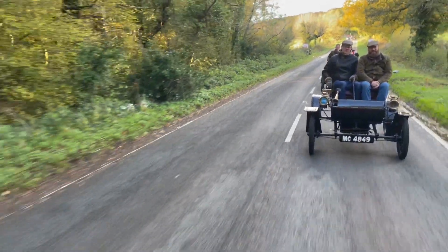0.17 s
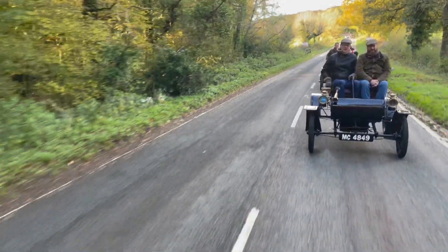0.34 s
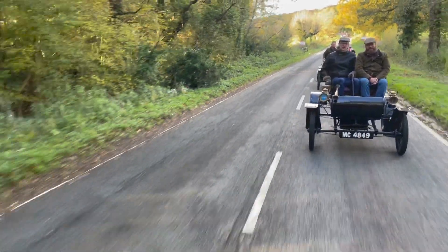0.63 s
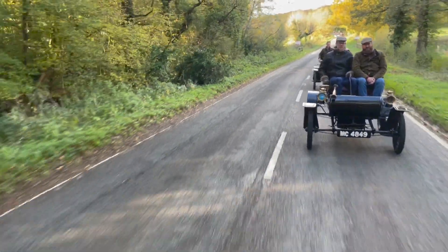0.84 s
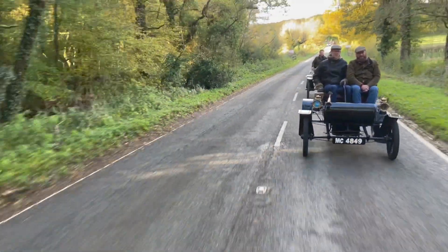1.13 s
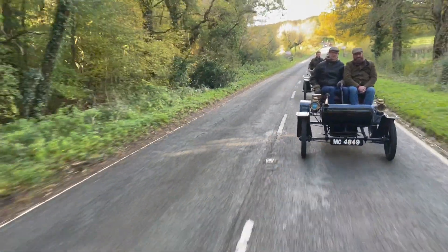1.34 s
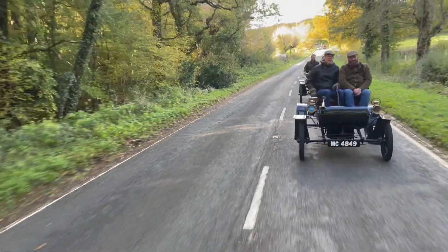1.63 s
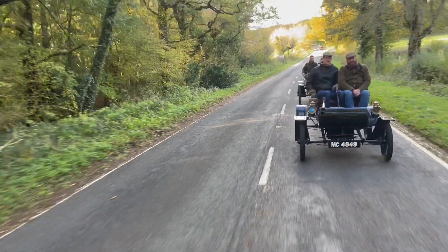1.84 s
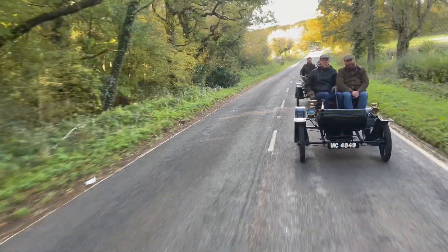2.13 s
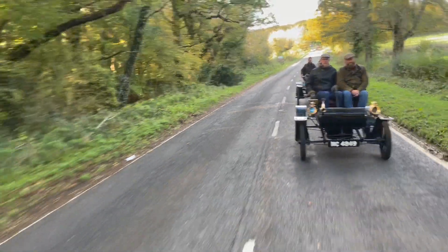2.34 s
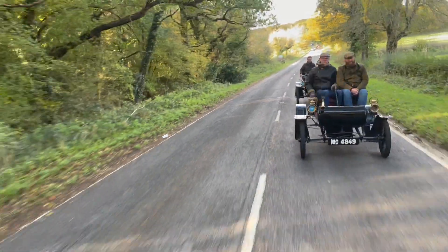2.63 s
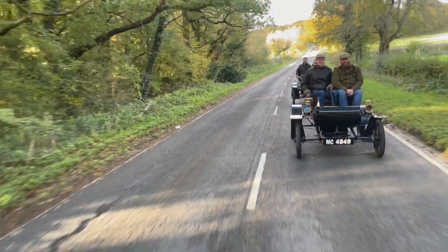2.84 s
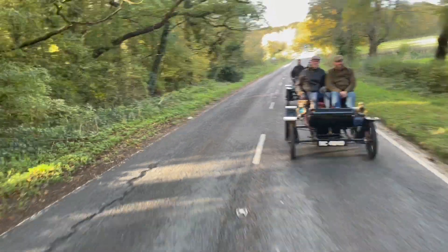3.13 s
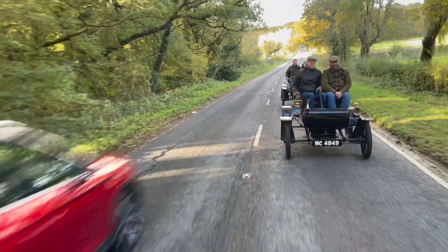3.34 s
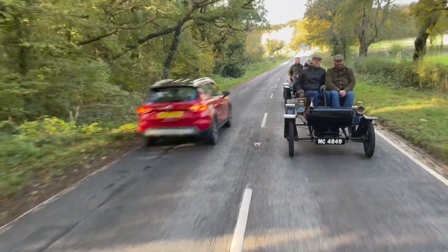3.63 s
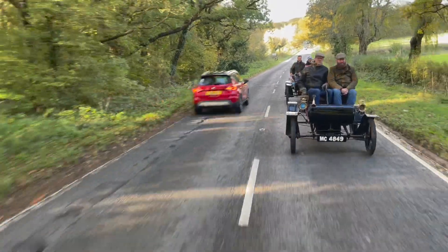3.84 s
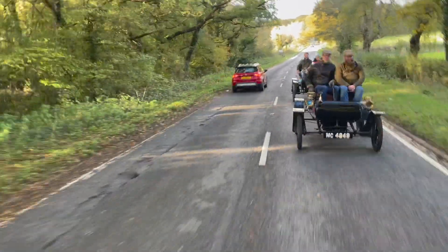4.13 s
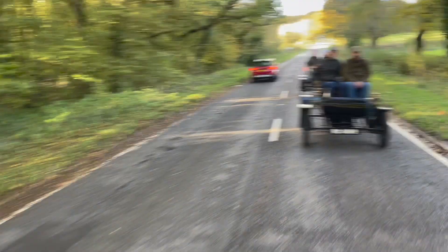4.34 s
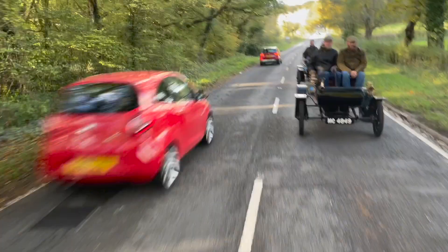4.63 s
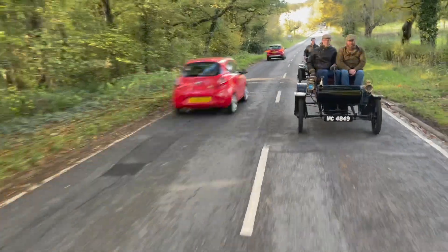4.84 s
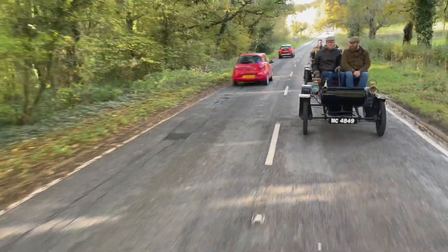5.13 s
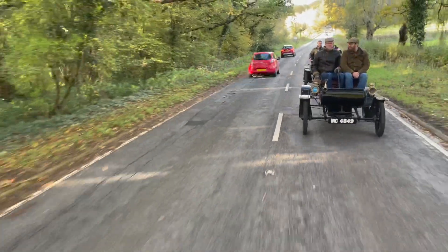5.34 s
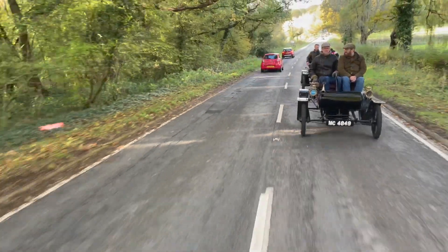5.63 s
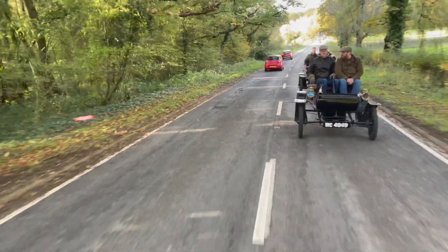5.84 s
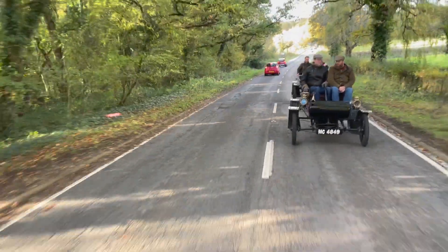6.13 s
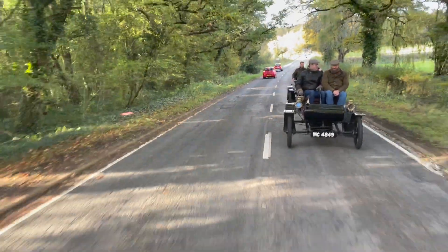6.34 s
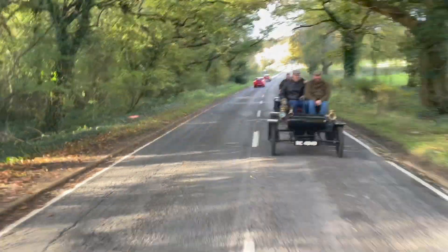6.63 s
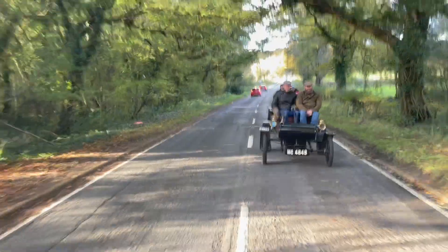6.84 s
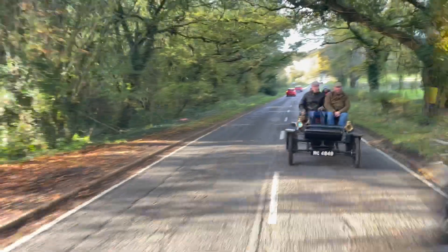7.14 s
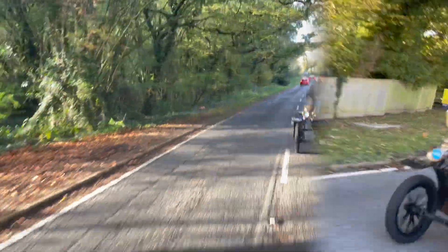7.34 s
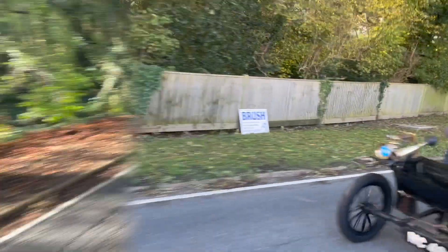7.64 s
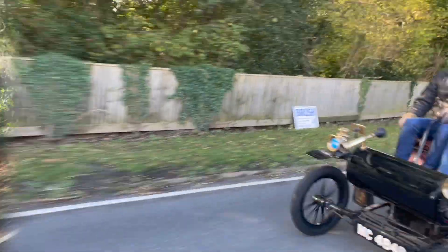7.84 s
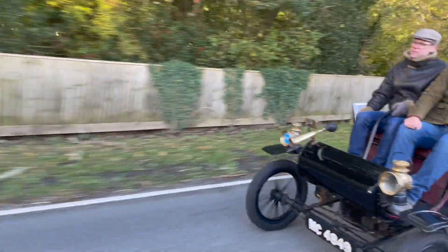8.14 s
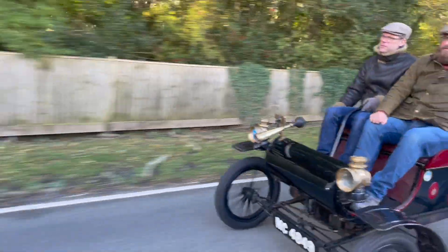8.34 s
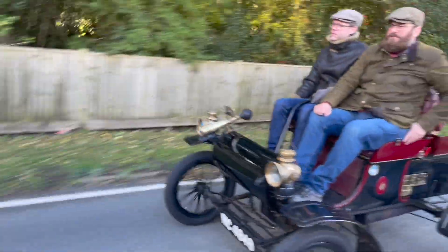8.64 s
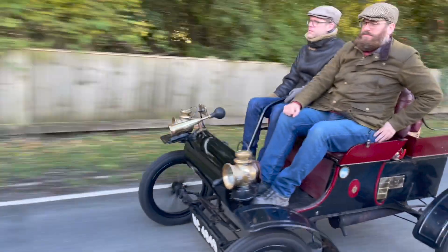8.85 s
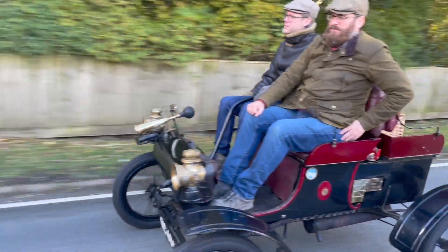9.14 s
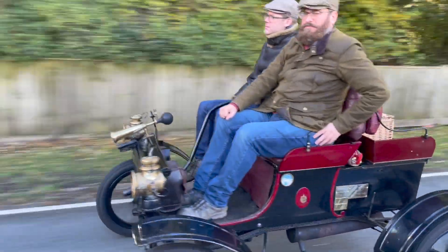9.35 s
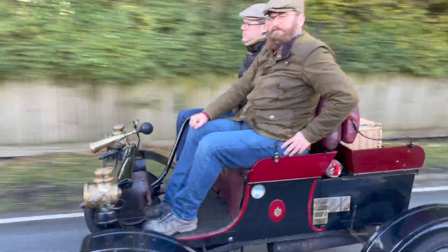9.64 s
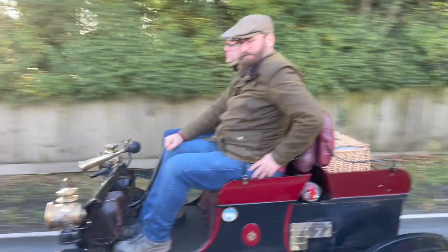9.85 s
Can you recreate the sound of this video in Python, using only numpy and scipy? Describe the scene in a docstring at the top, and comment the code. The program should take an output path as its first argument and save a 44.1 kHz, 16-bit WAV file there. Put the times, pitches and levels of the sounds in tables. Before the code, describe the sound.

Wind thumps a microphone on a moving veteran car; its engine clatters, two cars swish past, then a hissing single-cylinder engine chuffs loudly alongside.

```python
"""Engine thuds and puffs are heard first, on board an old car on a country road, with tyre roar and wind
buffeting. A single-cylinder veteran car is heard behind, hissing at each firing; from about 7.4 s its chuffs
are much louder and come faster. Two oncoming cars swish past, and the airstream hums and moans in a hollow of
the bodywork. Engines are pulses of noise and clicks through resonances; tyres and wind are coloured noise with
moving levels; eddies are short knocks of falling pitch, and the moan is a gliding tone."""
import sys
import numpy as np
from scipy import signal
from scipy.fft import rfft, irfft, next_fast_len
from scipy.io import wavfile
from scipy.ndimage import uniform_filter1d, map_coordinates

SR = 44100
rng = np.random.default_rng(int(sys.argv[2]) if len(sys.argv) > 2 else 0)


def output_pcm(signal):
    """Save a mono or channel-first signal as 16-bit PCM at the path in sys.argv[1].

    Samples are clipped to [-1, 1] before scaling.
    """
    pcm = np.clip(np.atleast_2d(signal).T, -1, 1) * 32767
    wavfile.write(sys.argv[1], SR, np.round(pcm).astype(np.int16))


N = 440559
T = np.arange(N) / SR  # t/s

# All levels in the tables are relative: the functions add their own trims.
# Own engine, running count of firings: t/s, firings so far
OWN_FIRINGS = [(.0213, 0), (.758, 11), (1.3635, 20), (1.768, 26), (2.72, 40), (2.924, 43), (3.888, 57),
               (4.168, 61), (4.7925, 70), (5.493, 80), (6.904, 100), (8.33, 120), (10.02, 144)]
# Own engine, parts of each knock: t/s, knock level/dB, clatter level/dB, ring level/dB
KNOCK_LEVELS = [(0, -27, -32.5, -40), (1.2, -30.5, -29.5, -35), (1.7, -29.5, -30.5, -32),
                (2.05, -24.5, -28.5, -26.5), (2.6, -27.5, -35, -28), (3.2, -30, -34, -29),
                (3.6, -34, -34, -32), (4, -32, -31, -34), (5.2, -34.5, -32, -40), (5.9, -34.5, -32, -41),
                (6.5, -40, -31.5, -39), (7.1, -42, -32, -38), (7.7, -46, -46, -48), (8.5, -37, -49, -42),
                (9.99, -45, -48, -49)]
# Own engine, thud through the body: t/s, level/dB
THUD_LEVEL = [(0, -28.5), (1.5, -25.5), (2.2, -19.5), (4, -20), (6.2, -22.5), (7.2, -30), (7.8, -24),
              (8.4, -34), (9, -24), (9.99, -34)]
# Resonances of knock, clatter, ring and body: f/Hz, width/Hz, level/dB
KNOCK_MODES = [(893, 52, 0), (745, 70, -12)]
CLATTER_MODES = [(1272, 85, 0)]
RING_MODES = [(1390, 38, 0), (1830, 70, -5)]
BODY_MODES = [(70.3, 17.5, -5), (101.7, 7.2, 2), (170, 55, -12), (261, 22, -9)]

# Single cylinder, count of firings while following and while alongside: t/s, firings so far
FOLLOWING_FIRINGS = [(.126, 0), (.77, 4), (1.583, 9), (2.405, 14), (3.235, 19), (4.08, 24), (4.934, 29),
                     (5.805, 34), (6.69, 39)]
ALONGSIDE_FIRINGS = [(7.42, 0), (8.112, 5), (8.798, 10), (9.34, 14), (9.875, 18)]
# Single cylinder, exhaust chuff: t/s, level/dB
CHUFF_LEVEL = [(0, -31.5), (2, -32), (2.7, -34), (4.3, -37), (5.3, -35.5), (6.5, -36.5), (7.4, -38),
               (7.75, -27), (8.15, -20.5), (9.3, -18), (9.99, -19)]
# Firings that bark: t/s, level/dB, ring f/Hz
BARKS = [(8.112, -26, 4900), (8.798, -38, 5100), (8.935, -27, 2350), (9.34, -20, 3600),
         (9.608, -20.5, 5340), (9.742, -28, 2900), (9.875, -28, 2500)]
# Spectrum of the exhaust jet: f/Hz, level/(dB per Hz)
CHUFF_SPECTRUM = [(300, -4), (900, 14), (1500, 7.5), (2300, 8), (3300, 5), (4200, 5), (5400, 6.5),
                  (6800, -3.5), (11500, 3), (14000, -3.5)]
# Stereo image of the exhaust jet: f/Hz, left-right likeness
CHUFF_LIKENESS = [(700, .1), (1500, 0.42), (2300, 0.88), (5500, 1), (9000, 0.3)]
# Resonances of the exhaust jet and of the silencer: f/Hz, width/Hz, level/dB
CHUFF_MODES = [(2400, 430, 2), (3090, 710, -1.5), (4770, 750, 0), (6300, 1500, 4)]
SILENCER_MODES = [(171, 24, 0), (382, 41, -7), (878, 45, -7.5), (1210, 260, -14)]

# Oncoming cars: t/s, swish level/dB, roar level/dB, half length/s
PASSES = [(3.378, -28, -27, .15), (4.49, -23, -26.5, .17)]
# Bright tyre hiss of the oncoming cars: t/s, level/dB, half length/s
SPRAYS = [(3.26, -33, 0.086), (4.405, -29, 0.035)]
# Spectra of swish, roar and spray: f/Hz, level/(dB per Hz)
SWISH_SPECTRUM = [(200, -8), (600, 20), (900, 26), (1150, 25), (1600, 12), (2600, 4), (7000, -15),
                  (14000, -40)]
ROAR_SPECTRUM = [(150, -20), (300, -5), (470, 0), (700, -7), (1200, -9), (3000, -50)]
SPRAY_SPECTRUM = [(1000, -20), (2000, -5), (2700, 1.5), (4000, -7), (7000, -11), (14000, -15)]

# Moan and hum of the hollow: t/s, moan f/Hz, moan level/dB, hum level/dB
MOAN = [(8.3, 490, -47, -62), (8.32, 500, -14.5, -19), (8.335, 612, -29, -20), (8.365, 607, -19, -14),
        (8.39, 580, -27, -21), (8.425, 543, -32, -14.5), (8.468, 440, -31, -17), (8.5, 396, -32, -24),
        (8.6, 380, -36, -24), (8.75, 380, -80, -80)]
# Noisy hum of the hollow: t/s, level/dB
HOLLOW_LEVEL = [(0, -22.5), (2.7, -24.5), (3.4, -25.5), (4.6, -32.5), (5.8, -21), (6.8, -29.5), (7.9, -49),
                (8.5, -23.5), (9.99, -33)]
# Resonances of the hollow: f/Hz, width/Hz, level/dB
HOLLOW_MODES = [(258.3, 30.4, 23), (513, 39, -14)]

# Eddies that hit the microphone: t/s, peak level/dB, f/Hz
THUMPS = [(0.284, -3.5, 340), (.296, -13, 427), (.835, -13, 285), (.87, -8.5, 179), (.891, -10.5, 420),
          (1.286, -1.5, 260), (1.298, -9, 301), (1.313, -2.5, 260), (1.321, -13, 243), (1.44, -7.5, 420),
          (1.598, -9.5, 337), (1.75, -5, 252), (1.762, -5.5, 383), (1.82, -10, 285), (1.858, -12, 434),
          (2.011, 0, 289), (2.114, 0, 450), (2.124, -3, 231), (2.137, -11, 484), (2.157, -3, 383),
          (2.19, -9, 288), (2.234, -1, 308), (2.245, -3, 328), (2.349, -2.5, 220), (2.603, -3.5, 288),
          (3.067, -11, 755), (3.073, -2, 197), (3.137, -6.5, 344), (3.208, -3.5, 540), (3.336, -11, 765),
          (3.471, -6, 480), (3.499, -10, 488), (3.519, -4, 169), (3.537, -4, 272), (3.56, -10, 498),
          (3.567, -8, 218), (4.176, -4, 218), (4.195, -7, 218), (4.279, -12, 292), (4.624, -9.5, 450),
          (5.21, -12, 281), (5.356, -9, 238), (5.365, -4.5, 223), (5.54, -10.5, 521), (5.664, -10.5, 389),
          (5.706, -9, 240), (5.721, -5.5, 527), (5.732, -1.5, 622), (5.769, -5.5, 501), (5.838, -6.5, 238),
          (5.913, -8, 294), (5.923, 2, 308), (6.075, -4.5, 540), (6.133, -6.5, 372), (6.146, -8, 770),
          (6.204, -13, 447), (6.22, -10, 557), (6.322, -16, 850), (6.339, -10.5, 702), (6.361, -13, 334),
          (6.39, -8, 329), (6.444, -4, 300), (6.482, -11, 398), (6.488, -10.5, 850), (6.494, -8, 596),
          (6.509, -7, 343), (6.536, -7, 515), (6.559, -6, 299), (6.586, -8, 356), (6.734, -7.5, 617),
          (6.743, -9, 620), (6.78, -10.5, 400), (6.804, -8, 603), (6.841, -8.5, 430), (6.893, -10, 520),
          (6.907, -16, 451), (6.941, -12, 602), (7.132, -13, 550), (7.152, -9, 560), (7.183, -8, 576),
          (7.276, -14, 328), (7.332, -17, 450), (7.529, -16, 651), (7.566, -14, 520), (7.85, -14, 404),
          (8.607, -7, 240), (8.635, -6.5, 329), (8.809, -9.5, 248), (9.38, -10.5, 282), (9.558, -11, 425)]
# Airflow at the microphone: t/s, level/dB
WIND_LEVEL = [(0, -23), (.55, -24.5), (.85, -15.5), (1.2, -18), (1.5, -27.5), (2.05, -15), (2.6, -21),
              (3.1, -15.5), (3.85, -19), (4.25, -18), (5.3, -19.5), (6.05, -13.5), (6.6, -23), (7.15, -25),
              (8.35, -20.5), (8.57, -16.5), (8.9, -22), (9.99, -23.5)]
# Deepest rumble over the rest: t/s, level/dB
DEEP_LEVEL = [(0, -18), (.6, -20), (1.3, -15), (2, -6.5), (9.99, -5.5)]
# Lulls, as the microphone falls into shelter: t/s, depth/dB, half length/s
LULLS = [(5.288, 0, 0.027), (5.458, 5, 0.026), (6.28, 15, 0.031), (7.85, 4.5, 0.49)]
# Spectra of rumble, deepest rumble, flutter and the tearing edge of gusts: f/Hz, level/(dB per Hz)
RUMBLE_SPECTRUM = [(25, -45), (45, -18), (60, -1), (75, 4), (105, 1.5), (150, -3), (220, -6.5),
                   (320, -11.5), (600, -85)]
DEEP_SPECTRUM = [(15, -20), (24, -16), (35, -9), (52, 3.5), (70, -1), (100, -25), (200, -70)]
FLUTTER_SPECTRUM = [(120, -8), (200, -1), (265, 0), (320, -3), (480, 4), (700, -4.5), (1100, -16.5),
                    (2200, -55), (5000, -79)]
CHOP_SPECTRUM = [(150, -25), (400, 0), (700, 0.5), (1100, -5), (1500, -9.5), (2500, -35), (5000, -70)]

# Tyre roar of the own car: t/s, level/dB
ROAD_LEVEL = [(0, -34.5), (2.1, -33), (4.7, -35.5), (5.9, -36), (6.55, -33.5), (7.1, -34), (7.45, -38.5),
              (7.75, -44.5), (8.1, -40.5), (8.45, -35), (9.35, -37.5), (9.6, -33), (9.99, -36)]
# Spectra of tyre roar and of the rush of air: f/Hz, level/(dB per Hz)
TYRE_SPECTRUM = [(60, -39), (260, 3), (500, 3), (900, 2), (1300, 0.5), (1650, -3), (2100, -3.5),
                 (2900, -15), (4500, -35), (9000, -78)]
HISS_SPECTRUM = [(900, -4), (2200, 9.5), (3200, 11.5), (5000, 7), (7000, 8.5), (11500, 3), (14000, -4.5)]

# Stereo image of noise: f/Hz, left-right likeness
LIKENESS = [(60, 0.84), (150, 0.92), (350, 0.61), (700, 0.09), (1400, 0.34), (2800, 0.36), (5500, 0.5),
            (10000, -2.33)]
# Stereo balance: f/Hz, left minus right level/dB
BALANCE = [(100, -0.5), (350, -0.5), (700, 3.5), (1400, -0.5), (2800, 0.5), (5500, 4), (10000, -1)]
# Brief dips of the whole level: t/s, depth/dB, recovery/s
DIPS = [(2.123, 3.5, 1), (5.726, 5, 0.52)]

DUCT_WIDTH_HZ = 260  # the duct rounds the start of each ring
SILENCER_DB = -13  # boom relative to the chuff curve
LINGER = 1.35  # a passing car fades this much more slowly than it swells
FLUTTER_DB, FLUTTER_GROWS = -25.5, 0.079  # at average wind, and dB per dB of wind
GUST_DB, GUST_RISE_S, GUST_FALL_S = -15.5, 0.013, 0.028  # level over the thump it carries, build-up, release
FLURRY_S, FLURRY_HALF_S, FLURRY_DB = 6.6, 0.31, -15  # spell of choppy air: middle, half length, eddy peak
FLURRY_EDDIES = 300
PATTER_DB, PATTER_GROWS, PATTER_HZ = -22, 0.36, 427.8  # eddy peak at average wind, dB per dB, middle pitch
CHOP_DB, CHOP_DB_PER_OCTAVE, CHOP_HZ, CHOP_S = -13.9794, 10, 600, 0.0087  # over a thump of CHOP_HZ; life
HISS_DB, HISS_GROWS = -33.5, 0.52  # rush of air, and its dB per dB of the chuff curve
LEFT_LEAD_S = .00002  # the whole scene reaches the left port this much earlier
TOP_HZ = 14000  # end of the band


def own_engine(left_lead_s=0.00018, tap_s=0.00401, gas_db=-11):
    """Impulsive excitation of resonators: each cycle knocks, clatters and rings, then thuds through the body."""
    times = firing_times(OWN_FIRINGS)
    knock_db, clatter_db, ring_db = curves(KNOCK_LEVELS)
    thud_db, = curves(THUD_LEVEL)
    gas_flow = bursts(times - .002, rise=.0007, hold=.007, decay=.003, scatter_db=.5)
    gas = gas_flow * rng.standard_normal(N)

    def click(at):
        """An impulse, far shorter than the resonances it excites."""
        return bursts(at, rise=.00005, hold=.00005, decay=.00005, scatter_db=1.2)

    def strike(blows, modes):
        """Resonance under mixed excitation: blows and gas noise, rounded by the duct."""
        tone = unit(ring(blows, modes)) + amp(gas_db) * unit(ring(gas, modes))
        return unit(ring(tone, [(modes[0][0], DUCT_WIDTH_HZ, 0)]))

    crack = click(times - .0018)
    tap = click(times + tap_s + .0005 * rng.standard_normal(len(times)))
    knock = amp(knock_db) * strike(crack, KNOCK_MODES)
    knock = knock + amp(clatter_db) * strike(crack + tap, CLATTER_MODES)
    knock = knock + amp(ring_db) * strike(tap, RING_MODES)
    # the sound reaches the left port first
    ports = np.array([[1], [-1]])
    puff = filtered(knock, lambda hz: np.exp(1j * np.pi * hz * left_lead_s * ports))
    push = bursts(times + .031, rise=0.00087, hold=0.00017, decay=0.0024, scatter_db=2.5)
    return puff + amp(thud_db) * unit(ring(push, BODY_MODES))


def single_cylinder(spit=0.15, bark_width_hz=1300):
    """Pulsed jet noise: gas hisses out at each firing, the piston pushes out the rest, and the silencer booms."""
    times = np.concatenate([firing_times(FOLLOWING_FIRINGS), firing_times(ALONGSIDE_FIRINGS)])
    level_db, = curves(CHUFF_LEVEL)
    blow = bursts(times, rise=0.002, hold=0.025, decay=0.014, scatter_db=0.26)
    crack = bursts(times + 0.0031, rise=.0003, hold=0.0015, decay=0.0025, scatter_db=1.0)
    sweep = bursts(times + 0.037, rise=0.0077, hold=0.023, decay=0.037, scatter_db=1.0)
    jet = rush(CHUFF_SPECTRUM, CHUFF_LIKENESS)
    pipe = patchy(jet + .35 * unit(ring(jet, CHUFF_MODES)), depth_db=2.0)
    gas = amp(level_db - 1.0) * (blow + spit * crack + 0.41 * sweep) * pipe
    for s, db, hz in BARKS:
        bark = bursts([s], rise=0.0011, hold=0.024, decay=0.0074, scatter_db=1.5)
        gas = gas + amp(db - 5.5) * bark * unit(ring(jet, [(hz, bark_width_hz, 0)]))
    boom = unit(ring((blow + sweep) * rng.standard_normal(N), SILENCER_MODES))
    gas = gas + amp(level_db + SILENCER_DB) * boom
    grit = amp(2.1 * wobble(450))
    heard = bounced(gas * grit, .0016 + 0.000348 * wobble(3), strength=0.48)
    return heard * amp([[.8], [-.8]])  # nearer the left


def oncoming_cars(bounce_s=0.0012, sweep_s=0.27):
    """Moving comb interference: each car gives a bright hiss, a low roar and a swish whose colour sweeps."""
    nearness = sum(1 / (1 + ((T - s) / sweep_s) ** 2) for s, *rest in PASSES)
    swish = unit(bounced(rush(SWISH_SPECTRUM), bounce_s * np.sqrt(nearness), strength=.6))
    swish = swish * swells([(s, db, half) for s, db, _, half in PASSES])
    roar = rush(ROAR_SPECTRUM) * swells([(s, db, half) for s, _, db, half in PASSES])
    return swish + roar + swells(SPRAYS) * rush(SPRAY_SPECTRUM)


def moan(width_hz=9, hum_hz=256, hum_waver_hz=4, overtone_db=-13):
    """Flow-excited cavity tone: the hollow hums while a moan above it jumps up and slides down in pitch."""
    hz, moan_db, hum_db = curves(MOAN)
    phase = 2 * np.pi * np.cumsum(hz + width_hz * wobble(120)) / SR
    slide = np.sin(phase) + amp(overtone_db) * np.sin(2 * phase)
    hum = np.sin(2 * np.pi * np.cumsum(hum_hz + hum_waver_hz * wobble(60)) / SR)
    begun = T > MOAN[0][0]
    return begun * amp(1.5 * wobble(110)) * (amp(moan_db) * slide + amp(hum_db) * hum)


def eddies(rows, glide_s=.0039, low_hz=130, rise_s=0.0021, life_cycles=2.16, rough=0.25):
    """Vortex impact: each eddy (t/s, peak level/dB, f/Hz) knocks for a few cycles, its pitch plunging as it dies."""
    out, t = np.zeros((2, N + SR)), np.arange(-SR // 140, SR // 16) / SR
    for (s, db, hz), chance in zip(rows, rng.standard_normal((len(rows), 3))):
        shape = np.exp(-np.where(t < 0, (t / rise_s) ** 2, t * hz / life_cycles))
        pitch = low_hz + (hz - low_hz) * np.exp(-t / glide_s)
        # a random start, and a random offset at each port
        phase = 2 * np.pi * (np.cumsum(pitch) / SR + chance[0]) + 0.41 * chance[1:, None]
        out[:, max(round((s + t[0]) * SR), 0):][:, :len(t)] += amp(db) * shape * np.sin(phase)
    roughness = rush([(300, 7.0), (700, -5.5), (2500, -38), (6000, -70)])
    return out[:, :N] * (1 + rough * roughness)


def chop():
    """Small-scale turbulence: a rough burst tears at the ports with each thump, stronger for the higher ones."""
    out, t = np.zeros(N + SR), np.arange(-SR // 50, SR // 16) / SR
    shape = np.exp(-np.abs(t) / np.where(t < 0, CHOP_S / 2, CHOP_S))
    for s, db, hz in THUMPS:
        burst_db = db + CHOP_DB + CHOP_DB_PER_OCTAVE * np.log2(hz / CHOP_HZ)
        out[round((s + t[0]) * SR):][:len(t)] += amp(burst_db) * shape
    return out[:N] * unit(amp(3.6 * wobble(400)) * rush(CHOP_SPECTRUM))


def flurry(scatter_db=3.3, scatter_octaves=.5):
    """Random vortex arrivals: small eddies patter, harder in strong wind and in a spell of choppy air."""
    times = (np.arange(FLURRY_EDDIES) + rng.random(FLURRY_EDDIES)) / FLURRY_EDDIES * T[-1]
    size, pitch = rng.standard_normal((FLURRY_EDDIES, 2)).T
    wind_db = np.interp(times, *np.transpose(WIND_LEVEL))
    spell = amp(FLURRY_DB) * np.exp(-((times - FLURRY_S) / FLURRY_HALF_S) ** 2)
    patter = amp(PATTER_DB + PATTER_GROWS * (wind_db - wind_db.mean()))
    peak_db = 20 * np.log10(shelter(times) * np.hypot(spell, patter))
    hz = PATTER_HZ * 2 ** (scatter_octaves * pitch)
    return eddies(np.transpose([times, peak_db + scatter_db * size, hz]))


def wind(gust_flutter_db=-5):
    """Turbulent pressure at the microphone: airflow and gusts drive rumble and lumpy flutter; a hollow hums."""
    strength_db, = curves(WIND_LEVEL)
    hum_db, = curves(HOLLOW_LEVEL)
    deep_db, = curves(DEEP_LEVEL)
    flutter_db = FLUTTER_DB + FLUTTER_GROWS * (strength_db - strength_db.mean())
    lumps, gust = wobble(55), gusts()
    low_noise = rush(RUMBLE_SPECTRUM) + amp(deep_db) * rush(DEEP_SPECTRUM)
    # airflow and gusts add as powers
    rumble_gain = np.hypot(amp(strength_db + 0.5 + 1.8 * wobble(12)), gust)
    rumble = rumble_gain * unit(amp(lumps) * low_noise)
    flutter_gain = np.hypot(amp(flutter_db), amp(gust_flutter_db) * gust)
    flutter = flutter_gain * unit(amp(1.34 * lumps + 1.96 * wobble(160)) * rush(FLUTTER_SPECTRUM))
    hum = amp(hum_db - 1.0) * unit(ring(rush(FLUTTER_SPECTRUM), HOLLOW_MODES))
    return shelter(T) * (rumble + flutter + hum)


def gusts():
    """Pressure build-up and release: the air swells just before each thump and ebbs after it."""
    out, t = np.zeros(N + SR), np.arange(-SR // 8, SR // 4) / SR
    shape = np.exp(np.minimum(t / GUST_RISE_S, -t / GUST_FALL_S))
    for s, db, hz in THUMPS:
        out[round((s + t[0]) * SR):][:len(t)] += amp(db + GUST_DB) * shape
    return out[:N]


def shelter(t):
    """Shielding from flow: gain of the wind at times t, low during the lulls."""
    return amp(-sum(depth * np.exp(-((t - s) / half) ** 2) for s, depth, half in LULLS))


def road():
    """Broadband rolling noise: tyres roar on asphalt under a hiss that grows and falls with the other car's
    chuff."""
    roar_db, = curves(ROAD_LEVEL)
    near_db, = curves(CHUFF_LEVEL)
    hiss_db = HISS_DB + HISS_GROWS * (near_db - near_db.mean())
    roar = amp(roar_db + 9 + 1.1 * wobble(25)) * rush(TYRE_SPECTRUM)
    return roar + amp(hiss_db + 1.52 * wobble(30)) * rush(HISS_SPECTRUM)


def firing_times(firings):
    """Inverse of a running count: the moments at which it reaches whole numbers."""
    s, count = np.transpose(firings)
    return np.interp(np.arange(count[-1] + 1), count, s)


def bursts(times, rise, hold, decay, scatter_db):
    """Valve flow: gas flows through a valve that opens at each time, stays open, and closes (settings in s)."""
    flow, t = np.zeros(N + SR), np.arange(SR // 4) / SR
    shape = (1 - np.exp(-t / rise)) * np.exp(-np.maximum(t - hold, 0) / decay)
    for s, chance in zip(times, rng.standard_normal(len(times))):
        flow[max(round(s * SR), 0):][:len(t)] += amp(scatter_db * chance) * shape
    return flow[:N]


def swells(rows):
    """Spreading with distance: pressure rises and falls as each thing goes by, and lingers behind it."""
    total = 0
    for s, db, half in rows:
        width = np.where(T > s, half * LINGER, half)
        total = total + amp(db) / (1 + ((T - s) / width) ** 2)
    return total


def bounced(x, delay_s, strength):
    """Comb filtering: the bounce off the road interferes; its delay shifts as the cars move."""
    echo = np.array([np.interp(T - delay_s, T, port) for port in x])
    return (x + strength * echo) / np.hypot(1, strength)


def patchy(x, depth_db, size=(4, 36)):
    """Random spectral modulation: the colour of a noise shifts; size is in frequency bins and time frames."""
    z = signal.stft(x, nperseg=512)[2]
    field = uniform_filter1d(rng.standard_normal(z.shape[1:]), size[0], 0)
    field = uniform_filter1d(field, size[1], 1)
    return unit(signal.istft(z * amp(depth_db * unit(field)), nperseg=512)[1][:, :N])


def rush(spectrum, likeness=LIKENESS):
    """Partial coherence: coloured stereo noise of rms 1, as the two microphone ports hear it."""
    def colour(hz):
        """Spectral shaping: responses of the mid and side noises, which set the likeness of the ports."""
        turn = np.arccos(np.clip(along(likeness, hz), -1, 1)) / 2
        band = (hz > 15) * (hz < TOP_HZ)
        return amp(along(spectrum, hz)) * np.array([np.cos(turn), np.sin(turn)]) * band

    mid, side = filtered(rng.standard_normal((2, N)), colour)
    return unit(np.array([mid + side, mid - side]))


def ring(x, modes):
    """Modal superposition: x through a set of resonances."""
    def response(f):
        """Sum of damped second-order resonances."""
        return sum(amp(db) * 1j * f * w / (c * c - f * f + 1j * f * w) for c, w, db in modes)

    return filtered(x, response)


def filtered(x, response):
    """Linear filtering: the spectrum of x times a complex response of frequency."""
    m = next_fast_len(N + SR // 2)
    return irfft(rfft(x, m) * response(np.fft.rfftfreq(m, 1 / SR)), m)[..., :N]


def wobble(rate):
    """Random modulation: a smooth curve through random knots, rate of them a second."""
    return map_coordinates(rng.standard_normal(4096), [T * rate], mode="wrap")


def curves(rows):
    """Linear interpolation in time: one value per sample for each column after t/s."""
    s, *cols = np.transpose(rows)
    return [np.interp(T, s, c) for c in cols]


def along(points, hz):
    """Interpolation over a logarithmic frequency axis: points are (f/Hz, value)."""
    f, v = np.transpose(points)
    return np.interp(np.log(hz + 1), np.log(f + 1), v)


def amp(db):
    """Logarithmic level: decibels to gain."""
    return 10 ** (np.asarray(db) / 20)


def unit(x):
    """Normalisation of power: scale to rms 1."""
    return x / np.sqrt(np.mean(x ** 2) + 1e-20)


def scene():
    """Superposition of sources as heard from the moving car, with level and time differences between ports."""
    sources = own_engine() + single_cylinder() + oncoming_cars()
    air = moan() + eddies(THUMPS) + chop() + flurry() + wind()
    sides = np.array([[.5], [-.5]])

    def ports(hz):
        """Stereo level and time differences, split evenly over left and right."""
        return amp(sides * along(BALANCE, hz)) * np.exp(2j * np.pi * hz * LEFT_LEAD_S * sides)

    return filtered(sources + air + road(), ports)


def record(dry, low_cut_hz=38):
    """Band limiting and saturation: deep bass drops, the level dips briefly twice, peaks are rounded."""
    dip_db = sum(depth * (T > s) * np.exp(-np.abs(T - s) / recovery) for s, depth, recovery in DIPS)
    x = filtered(dry, lambda hz: hz ** 2 / np.hypot(hz ** 2, low_cut_hz ** 2)) * amp(-dip_db)
    rounded = x / (1 + np.abs(x / .95) ** 6) ** (1 / 6)
    return filtered(rounded, lambda hz: hz < TOP_HZ)


dry = scene()
out = record(dry)
output_pcm(out)
```